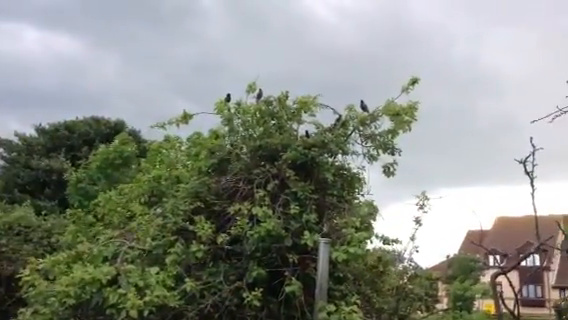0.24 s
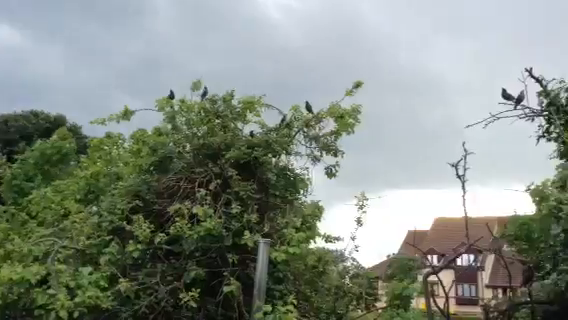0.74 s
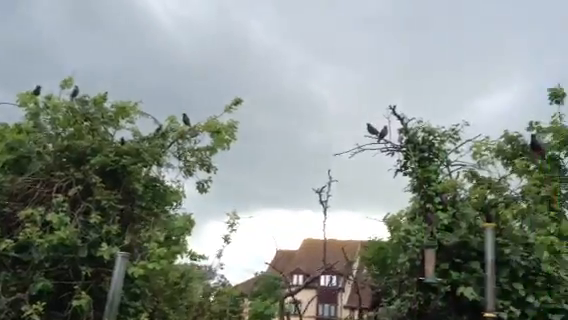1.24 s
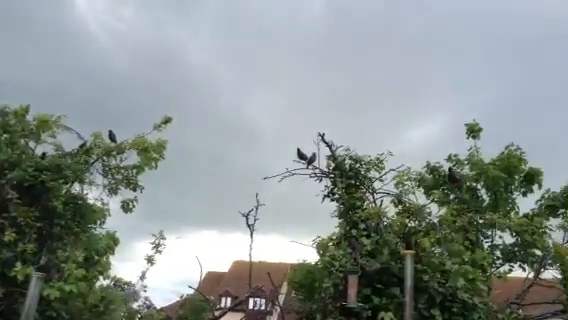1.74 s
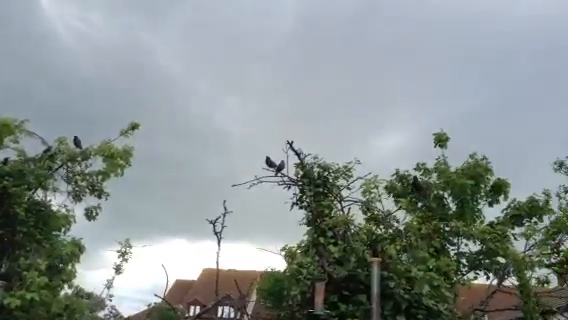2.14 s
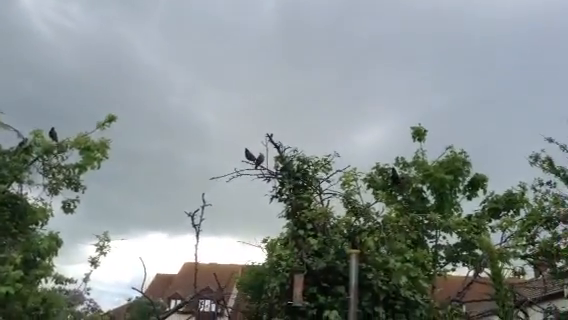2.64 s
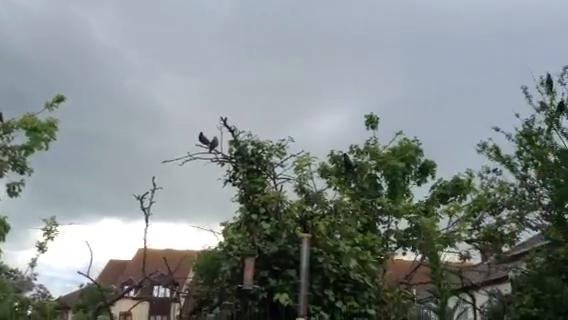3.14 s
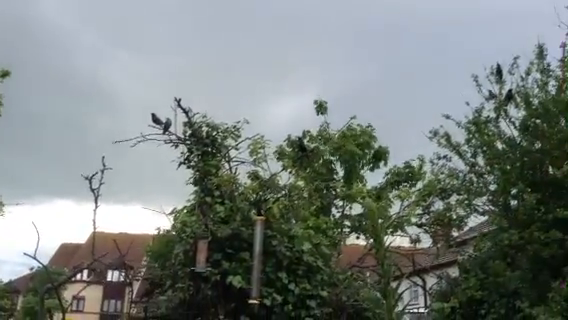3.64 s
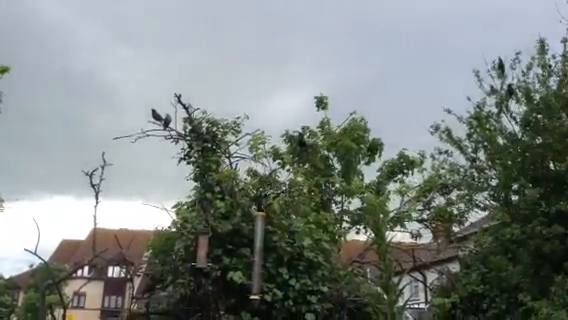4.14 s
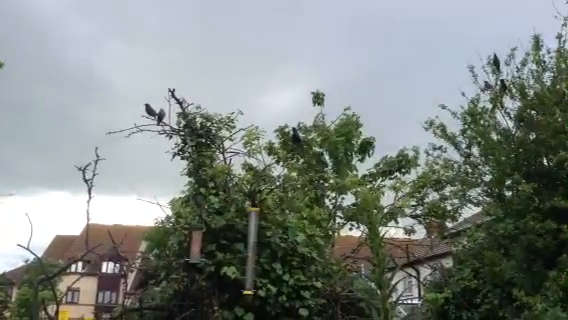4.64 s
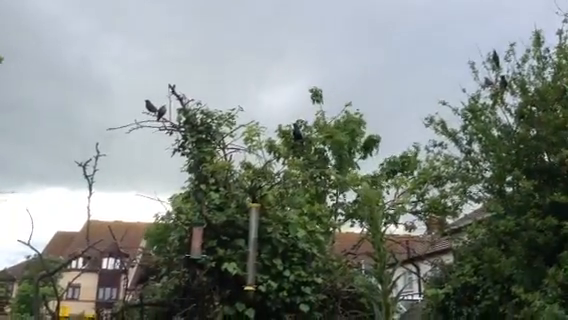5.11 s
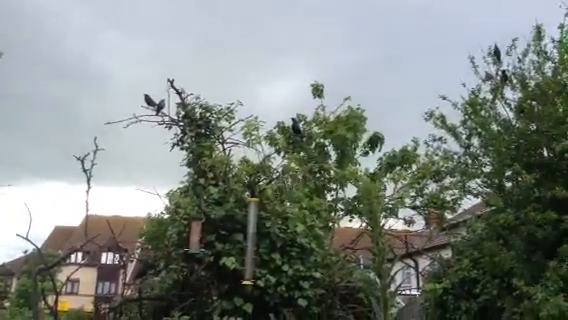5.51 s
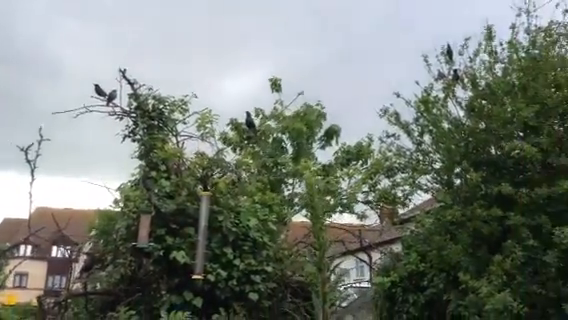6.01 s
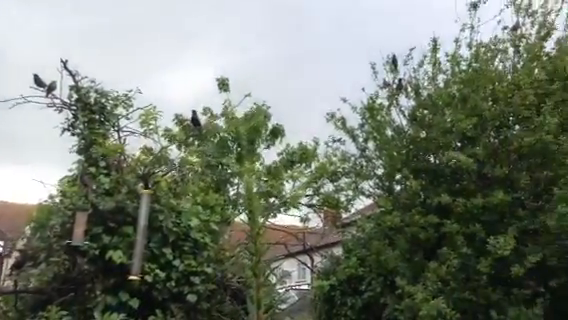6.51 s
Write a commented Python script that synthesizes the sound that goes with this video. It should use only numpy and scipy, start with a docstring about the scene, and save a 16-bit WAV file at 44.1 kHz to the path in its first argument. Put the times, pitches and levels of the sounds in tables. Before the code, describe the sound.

Scattered bright, scratchy starling chirps and churring squawks ring off leaves and house walls above faint road noise, a low engine hum and hiss.

```python
"""Starlings call in a suburban garden over far traffic, an engine hum and a faint steady hiss.
From the start, arched chirps join two voices of the syrinx, each frequency-swept and coupled to the other.
Tyres sing and fade near two seconds; begging squawks, the loudest late, churr by fast frequency modulation.
Short tones and faint lingering ones sound between; near five and a half seconds a whistled run steps down.
Gusts push the microphone, hardest near the end; leaves and walls scatter the calls as sparse reflections."""
import sys
import numpy as np
from scipy import signal
from scipy.fft import rfft, irfft, next_fast_len
from scipy.io import wavfile
from scipy.ndimage import uniform_filter1d

SR = 44100
rng = np.random.default_rng(int(sys.argv[2]) if len(sys.argv) > 2 else 0)


def waveform_to_disk(signal):
    """Save audio, clipped to [-1, 1], as 16-bit WAV at the path in sys.argv[1]."""
    frames = np.transpose(np.atleast_2d(signal))
    scaled = np.clip(frames, -1, 1) * 32767
    samples = np.round(scaled).astype(np.int16)
    wavfile.write(sys.argv[1], SR, samples)


N = 298557
TIME = np.arange(N) / SR


def gain_of(db):
    """Level to amplitude: 20 dB is a factor of ten."""
    return 10 ** (np.asarray(db) / 20)


def evened(x):
    """Normalization to a root-mean-square of 1."""
    return x / np.sqrt(np.mean(x ** 2) + 1e-20)


def follow(rows, at):
    """Linear interpolation of every column of a curve table."""
    first, *columns = np.transpose(rows)
    return [np.interp(at, first, c) for c in columns]


def read(points, hz):
    """Interpolation of a spectrum along a logarithmic frequency axis."""
    f, value = np.transpose(points)
    return np.interp(np.log(hz + 1), np.log(f + 1), value)


def coloured(x, points):
    """Linear filtering: the spectrum is multiplied by a response (frequency [Hz], gain [dB])."""
    size = next_fast_len(len(x) + 2048)
    response = gain_of(read(points, np.fft.rfftfreq(size, 1 / SR)))
    return irfft(rfft(x, size) * response, size)[:len(x)]


def wander(size, hz):
    """Low-passed noise of rms 1: a Gaussian spectrum of width hz makes it vary smoothly."""
    f = np.fft.rfftfreq(size, 1 / SR)
    return evened(irfft(rfft(rng.standard_normal(size)) * np.exp(-.5 * (f / hz) ** 2), size))


def turn(hz):
    """Phase is the running integral of frequency."""
    return 2 * np.pi * np.cumsum(hz) / SR


def arch(x, peak, rise, fall, power=2):
    """A bell of height 1 whose two flanks have separate widths."""
    return np.exp(-abs((x - peak) / np.where(x < peak, rise, fall)) ** power)


def step(x, middle, width):
    """A smooth hyperbolic-tangent transition from 0 to 1."""
    return .5 + .5 * np.tanh(.5 * (x - middle) / width)


def add(mix, s, sound):
    """Superposition: a sound is summed into the mix at its time in seconds."""
    start = round(s * SR)
    sound = sound[max(-start, 0):]
    part = mix[max(start, 0):][:len(sound)]
    part += sound[:len(part)]


def hiss(db=-64):
    """Stationary noise: random samples shaped by a fixed spectrum."""
    # hiss spectrum: (frequency [Hz], relative level [dB])
    hiss_spectrum = [(1000, 3), (2500, 1.5), (5000, 1), (8000, -1), (12000, -3), (15500, -7.5)]
    return gain_of(db) * evened(coloured(rng.standard_normal(N), hiss_spectrum))


def traffic(trim_db=-0.33):
    """Broadband noise of far traffic, under a slow level curve."""
    # traffic spectrum: (frequency [Hz], relative level [dB])
    road_spectrum = [(25, -38), (50, -35), (85, -16), (125, -10.5), (190, 0), (260, 1), (350, -3.5),
                     (520, -0.5), (700, -2.5), (1050, 0), (1500, -7), (2400, -16.5), (4000, -25),
                     (8000, -55.5)]
    # traffic level before the trim: (time [s], level [dB])
    road_level = [(0.0, -56), (0.43, -57.5), (2.71, -53.5), (5.85, -58), (6.5, -58)]
    road = evened(coloured(rng.standard_normal(N), road_spectrum))
    return gain_of(trim_db + follow(road_level, TIME)[0]) * road


def tyres(hz=900, width_hz=90):
    """Narrow-band noise: random amplitude and frequency modulation broaden a tone as a far car passes."""
    middle, swell, fade, db = 2.14, 1.16, 1, -58.5  # [s, s, s, dB]
    passing = gain_of(db) * arch(TIME, middle, swell, fade, power=0.68)
    carrier = np.sin(turn(hz + width_hz * wander(N, 58.0)))
    return passing * evened(wander(N, width_hz) * carrier)


def engine(hz=63, waver=0.00886):
    """A harmonic series: a far engine's firing note and overtones, each randomly swelling and fading."""
    # engine level curve: (time [s], level [dB])
    hum_level = [(0, -84), (1.2, -80), (2.6, -67), (4.3, -67), (5.2, -77), (6.77, -71)]
    # harmonics of the firing note: (multiple, relative level [dB])
    orders = [(1, -6), (2, -0.5), (3, -2), (4, 2)]
    firing = turn(hz * (1 + waver * wander(N, 2.27)))
    hum = sum(gain_of(db) * np.sin(k * firing) * (1 + .5 * wander(N, 5.7)) for k, db in orders)
    return gain_of(follow(hum_level, TIME)[0]) * evened(hum)


def rustles():
    """Exponential decay of noise: brief bright scuffs that die away at once."""
    # scuffs: (onset [s], level before the filter [dB], decay by a factor e [s])
    scuffs = [(3.026, -53.5, 0.067), (3.147, -55, 0.027), (3.219, -60, 0.042), (3.238, -57, 0.0079),
              (3.839, -63, .015), (4.972, -59, 0.025)]
    out, t = np.zeros(N), np.arange(SR // 4) / SR
    for s, db, decay in scuffs:
        add(out, s, gain_of(db) * rng.standard_normal(len(t)) * np.exp(-t / decay))
    return coloured(out, [(500, -13), (4000, 4), (8000, 5.5), (15000, 0.0)])


def gusts(unsteady=0.221, overtone_db=-14):
    """Aerodynamic pressure: each eddy pushes the microphone to and fro for uneven cycles."""
    # eddies: (middle [s], width between 1/e points [s], central pitch [Hz], level before the filter [dB])
    eddies = [(2.282, 0.043, 135, -59), (3.458, 0.029, 160, -41.5), (4.749, 0.33, 165, -57.5),
              (5.377, .03, 149.4, -44), (5.424, 0.042, 160, -45.5), (6.139, .073, 151, -56),
              (6.255, 0.056, 140, -55), (6.566, .02, 144.5, -34), (6.647, .03, 185.3, -27),
              (6.72, 0.45, 165.7, -50.5)]
    out, t = np.zeros(N), np.arange(-SR // 4, SR // 4) / SR
    for s, length, hz, db in eddies:
        phase = turn(hz * np.exp(unsteady * wander(len(t), 114)))
        push = np.sin(phase) + gain_of(overtone_db) * np.sin(2 * phase)
        push *= 1 + unsteady * wander(len(t), 68)
        add(out, s + t[0], gain_of(db) * evened(push) * np.exp(-(2 * t / length) ** 2))
    return coloured(out, [(25, -42.5), (60, -3), (130, -4), (400, -1.5), (900, -6)])


def scatter(x, t60, delay, onset):
    """Diffuse reverberation: sparse reflections of random sign build up and decay band by band."""
    taps = rng.choice([-1., 1.], SR) * (rng.random(SR) < 1 / 16)
    hz, t, z = signal.stft(taps, SR, nperseg=256)
    decay = gain_of(-60 * t / read(t60, hz)[:, None])
    tail = signal.istft(z * decay, SR, nperseg=256)[1]
    since = np.maximum(np.arange(len(tail)) / SR - delay, 0)
    tail *= 1 - np.exp(-since / onset)
    return signal.fftconvolve(x, tail / np.linalg.norm(tail))[:N]


def note(s, length, start_hz, end_hz, db, waver=0.0345):
    """A gliding sinusoid, made slightly hoarse by random frequency modulation."""
    t = np.linspace(0, length, round(length * SR))
    hz = np.interp(t, [0, length], [start_hz, end_hz]) * (1 + waver * wander(len(t), 377))
    whistle = np.sin(turn(hz)) * np.sin(np.pi * t / length)
    return s - length / 2, gain_of(db) * evened(whistle)


def squawk(s, length, hz, db, overtone_db, droop, chaos, trill_hz=98, chaos_hz=650, flutter=0.24):
    """Frequency modulation: a fast trill and chaotic membrane shaking tear one whistle into a churr."""
    # times in shares of the length: strain peaks early, and pitch and harshness follow it
    strain_peak, strain_rise, strain_fall, slack_harsh = .29, .27, .39, 0.33
    attack, release, fade_db = 0.24, 0.19, -6  # [share, share, dB over the length]
    t = np.arange(SR // 2) / SR
    part = t / length
    strain = arch(part, strain_peak, strain_rise, strain_fall)
    harsh = slack_harsh + (1 - slack_harsh) * strain
    swell = np.clip(part / attack, 0, 1) * np.clip((1 - part) / release, 0, 1)
    swell *= gain_of(fade_db * part)

    beat = turn(trill_hz * (1 + .35 * wander(len(t), 62.5)))
    trill = .18 * harsh * np.sin(beat)
    shaking = chaos * (0.419 + .5 * harsh) * wander(len(t), chaos_hz)
    phase = turn(hz * (1 - droop * (1 - strain)) * (1 + trill + shaking))
    voice_band = [(.42 * hz, -28), (.51 * hz, -6), (.62 * hz, 3), (1.33 * hz, -1), (1.46 * hz, -22),
                  (2.6 * hz, -28)]
    voice = coloured(np.sin(phase), voice_band)

    overtones = np.sin(2 * phase) + .5 * np.sin(3 * phase) + 0.67 * rng.standard_normal(len(t))
    overtone_band = [(1500, -7), (5400, -6), (6500, 1), (8500, -2), (9900, -0.5), (10700, -5.5),
                     (12000, -3), (15000, -8)]
    overtones = harsh * gain_of(overtone_db) * coloured(overtones, overtone_band)
    buzz = 1 + flutter * wander(len(t), 400) + .2 * np.sin(beat + 1)
    return s, gain_of(db) * swell * evened((voice + overtones) * buzz)


def perch(x, bounce=0.13, latest=.009):
    """Comb interference: four near reflections off twigs, fence and ground tie knots in a sweep."""
    size = next_fast_len(len(x) + 1024)
    hz = np.fft.rfftfreq(size, 1 / SR)
    delays, signs = rng.uniform(0.000393, latest, size=4), rng.choice([-1, 1], size=4)
    paths = 1 + bounce * signs @ np.exp(-2j * np.pi * np.outer(delays, hz))
    heard = irfft(rfft(x, size) * paths, size)[:len(x)]
    return evened(heard) * np.sqrt(np.mean(x ** 2))


def chirp(apex, top_hz, rise, fall, db, low_db, rasp, bright_db, coupling=2.22, overtone_db=-25,
          low_overtone_db=-4, hiss_db=-4, lag=0.00301):
    """Nonlinear coupling: two membranes sweep their own arches and make sum and difference tones."""
    # the clock: -1 is one rise before the apex, 0 the apex, 1 one fall after it
    foot_hz, arch_width, arch_power = 3058, .95, 1.75  # the upper voice arches from foot to top
    low_top_hz, low_per_upper = 1994, .28  # lower peak: this pitch plus a share of the upper top
    # the lower voice peaks earlier, drops fast and sags on
    low_foot, low_apex, low_rise, low_fall, low_sag = .39, -.33, .62, .42, 0.1707
    air_opens, voice_opens, opening = -1.5, -1.06, 0.1103  # air flows before the voices catch
    shuts, shutting = 1.32, 0.24
    loose_grip, locks, locking = 0.33, -0.0009, 0.034  # coupling tightens over the apex
    t = np.arange(-SR // 16, SR // 16) / SR
    clock = np.where(t < 0, t / rise, t / fall)
    low_clock = np.interp(t + lag * rng.uniform(-1, 1), t, clock)  # the sides are out of step

    upper_arch = arch(clock, 0, arch_width, arch_width, arch_power)
    low_share = low_foot + (1 - low_foot) * arch(low_clock, low_apex, low_rise, low_fall)
    low_share *= np.exp(-low_sag * np.maximum(low_clock, 0))
    shake = [1 + .07 * rasp * wander(len(t), 600) + .03 * wander(len(t), 130) for _ in range(2)]
    upper = turn((foot_hz + (top_hz - foot_hz) * upper_arch) * shake[0])
    lower = turn((low_top_hz + low_per_upper * top_hz) * low_share * shake[1])

    grip = loose_grip + (1 - loose_grip) * step(clock, locks, locking)
    valve = np.exp(coupling * grip * (0.44 + rasp) * np.sin(lower))  # lower voice pulses the air
    valve /= np.sqrt(uniform_filter1d(valve ** 2, size=128))
    lead = gain_of(3 * wander(len(t), 120))  # the two voices take the lead in turn
    voices = (np.sin(upper) + gain_of(overtone_db) * np.sin(2 * upper)) * valve * lead
    low_overtones = sum(np.sin(k * lower) / (k - 1) for k in range(2, 6))
    low_voice = np.sin(lower) + grip * gain_of(low_overtone_db) * low_overtones
    voices += gain_of(low_db) * np.sqrt(low_share) * low_voice / lead

    air = rasp * gain_of(hiss_db) * rng.standard_normal(len(t))  # turbulence in a forced call
    voiced = step(clock, voice_opens, opening)
    release = 1 - step(clock, shuts, shutting)
    flow = (voices * voiced + air * step(clock, air_opens, opening)) * release
    call = perch(coloured(flow, [(3000, -bright_db), (12000, bright_db)]))
    gate_rms = np.sqrt(np.mean((voiced * release) ** 2))  # the level holds for the open gate
    return apex + t[0], gain_of(db) * evened(call) * gate_rms


def calls():
    """Source and filter: the beak shapes the chirps; squawks and notes are superposed on them."""
    # chirps, levels before the beak filter: (apex [s], upper voice top [Hz], rise [s], fall [s],
    # level [dB], lower voice level [dB], rasp [0-1], tilt [dB down at 3 kHz and up at 12 kHz])
    chirp_rows = [ (0.000, 6650, .020, 0.012, -28, -10, 0.64, 1),
                  (0.133, 6540, 0.023, 0.016, -32, -5, 0.3, -2.5),
                  (0.152, 6424, 0.015, 0.02, -34, -18, 0.02, 8),
                  (0.48, 7430, 0.026, 0.013, -40, 1, 0.55, -1),
                  (0.498, 5800, .011, 0.014, -36.5, 4, 0.53, 3.5),
                  (0.615, 8510, .020, 0.025, -33, -12, 0.39, 1),
                  (0.667, 6730, 0.0066, 0.012, -30, -12, 0.53, 0.5),
                  (0.707, 8020, 0.022, 0.022, -23.5, -10, 0.47, 2),
                  (1.198, 6800, .021, 0.017, -33, -8, 0.43, -0.5),
                  (1.462, 8090, 0.02, .014, -30, -4, 0.3, 4),
                  (1.546, 6530, 0.024, 0.025, -37, 2.5, 0.44, 3),
                  (1.828, 8644, 0.023, .018, -22.5, -8, 0.46, 1.5),
                  (2.017, 8310, .022, 0.018, -34, 5.5, 0.03, 9),
                  (2.124, 6610, 0.016, .022, -31.5, -2, 0.37, 2.5),
                  (2.863, 8734, .025, .016, -24, -5, 0.61, 0.5),
                  (3.539, 8400, 0.023, .015, -31, -10, 0.18, 4),
                  (4.108, 6640, 0.015, 0.0204, -28, -5, 0.34, 5.5),
                  (4.168, 8360, .022, 0.015, -23, -10.5, 0.55, -0.5),
                  (4.221, 8170, 0.016, 0.032, -32.5, -10, 0.57, .5),
                  (5.422, 8330, .022, 0.016, -35.5, -11, .17, 1),
                  (5.535, 7180, .021, 0.019, -35, -5, 0.49, 0.5),
                  (6.235, 7770, 0.013, 0.019, -35, -6.5, 0.4, 2),
                  (6.751, 7350, .021, 0.013, -33.5, -11, 0.45, -3)]
    # beak response: (frequency [Hz], gain [dB])
    beak = [(800, -35.5), (1600, -4), (2600, -5.5), (4000, 0), (6000, 2), (8000, -1), (9500, -6),
            (12000, -6), (15500, -9)]
    # begging squawks: (onset [s], length [s], pitch at full strain [Hz], level before the swell [dB],
    # overtone level [dB], pitch droop [share], chaotic shaking [share of the pitch])
    squawk_rows = [(1.132, 0.32, 2974, -49, -9, 0.18, 0.18), (4.581, 0.29, 3900, -34, -10.5, .26, 0.14),
                   (5.898, .26, 2843, -50, -21, .16, 0.203), (6.556, .31, 3740, -34, -15.5, 0.23, .15)]
    # short far notes, faint lingering tones after calls, and a stepping whistle:
    # (middle [s], length [s], start [Hz], end [Hz], level [dB])
    note_rows = [(2.32, .18, 4280, 4310, -65.5), (2.344, 0.12, 5270, 5380, -67.5),
                 (3.185, 0.078, 2190, 2250, -66), (3.235, 0.052, 2840, 2670, -64),
                 (3.669, 0.14, 5510, 5430, -64.5), (4.91, 0.13, 5350, 5320, -70.5),
                 (5.583, 0.019, 3650, 3950, -46.5), (5.601, 0.026, 4600, 3450, -44),
                 (5.625, 0.026, 3250, 3120, -47.5), (5.647, 0.029, 3400, 2440, -50),
                 (6.205, 0.044, 6220, 4700, -58)]
    out = np.zeros(N)
    for row in chirp_rows:
        add(out, *chirp(*row))
    out = coloured(out, beak)
    for row in squawk_rows:
        add(out, *squawk(*row))
    for row in note_rows:
        add(out, *note(*row))
    return out


def birds(direct_db=-3.0, leaves_db=-4, houses_db=-22):
    """Multipath propagation: calls come direct, off nearby leaves and fences, and back from houses."""
    # reverberation among the houses: (frequency [Hz], time to fall 60 dB [s])
    garden_t60 = [(500, 0.87), (3000, 0.61), (6000, 0.52), (9000, 0.42), (15000, 0.23)]
    # echoes off house walls: (delay [s], level [dB])
    walls = [(.19, -27), (0.294, -32)]
    direct = calls()
    # reflection is uneven over frequency
    bounced = coloured(direct, [(1600, -0.9), (3500, -0.84), (5200, 1.4), (6500, -0.57),
                                (8400, -0.75), (11000, 1.77)])
    leaf_t60 = [(1500, 0.26), (5500, 0.19), (9000, 0.19), (14000, 0.16)]
    leaves = scatter(bounced, leaf_t60, delay=0.00099, onset=0.001)
    houses = gain_of(houses_db) * scatter(bounced, garden_t60, delay=0.016, onset=0.014)
    # a long path dulls the treble
    far = coloured(bounced + leaves, [(6000, -9.5), (9000, -14.5), (15000, -20)])
    for delay, db in walls:
        add(houses, delay, gain_of(db) * far)
    return gain_of(direct_db) * direct + gain_of(leaves_db) * leaves + houses


def scene():
    """Superposition of all sources in the garden, in one channel."""
    background = hiss() + traffic() + tyres() + engine()
    return (background + rustles() + gusts() + birds())[None]


def record(dry):
    """Band limiting: the recorder cuts the deepest rumble and the top of the treble."""
    edge_hz = 15600
    lean = signal.sosfilt(signal.butter(3, 48, "highpass", fs=SR, output="sos"), dry)
    treble_cut = signal.firwin(511, edge_hz, window=("kaiser", 9), fs=SR)
    return signal.oaconvolve(lean, treble_cut[None], "same")


dry = scene()
out = record(dry)
waveform_to_disk(out)
```